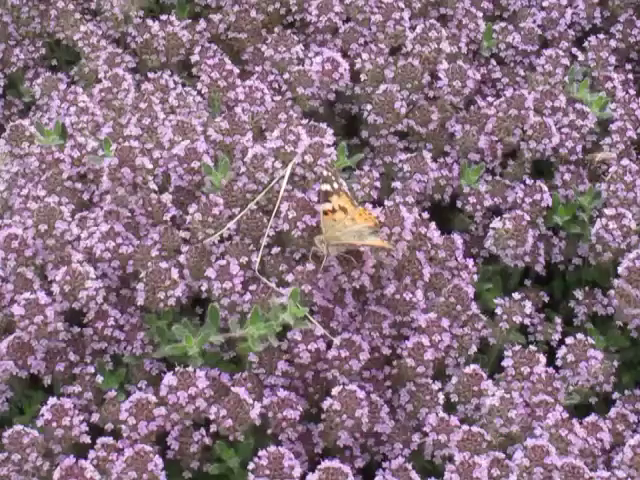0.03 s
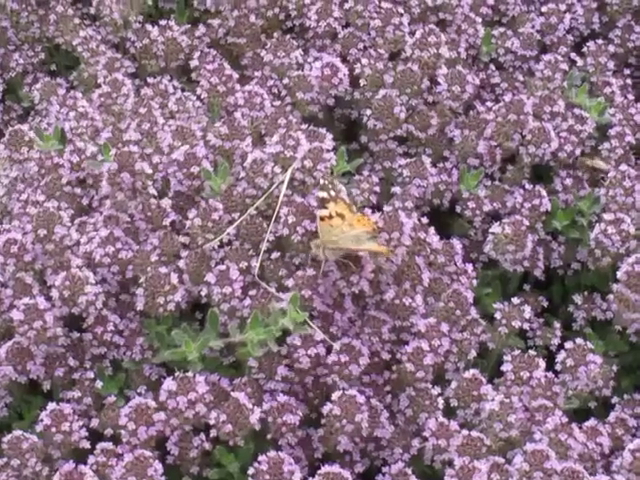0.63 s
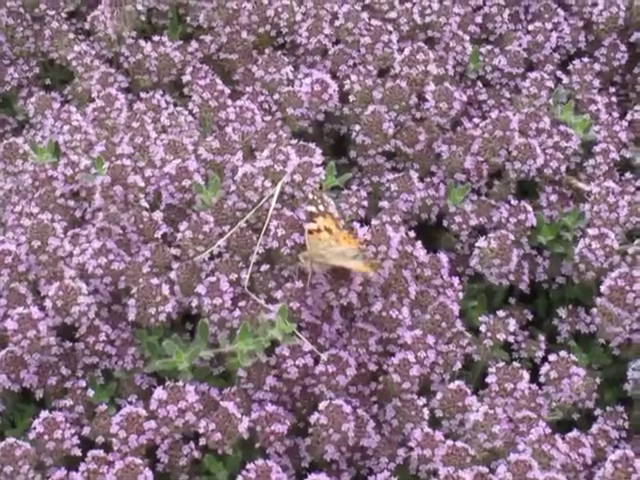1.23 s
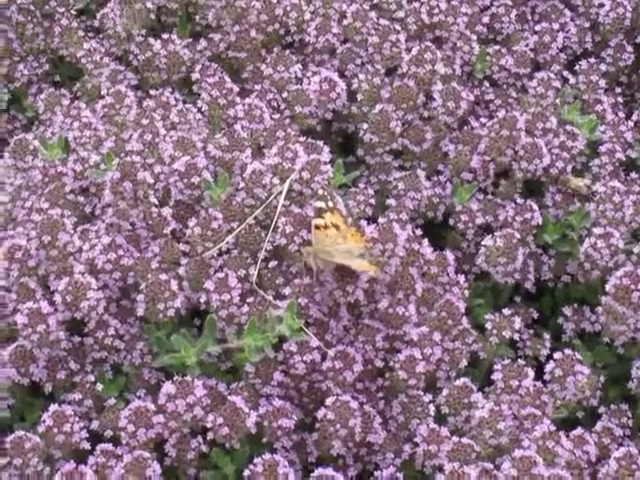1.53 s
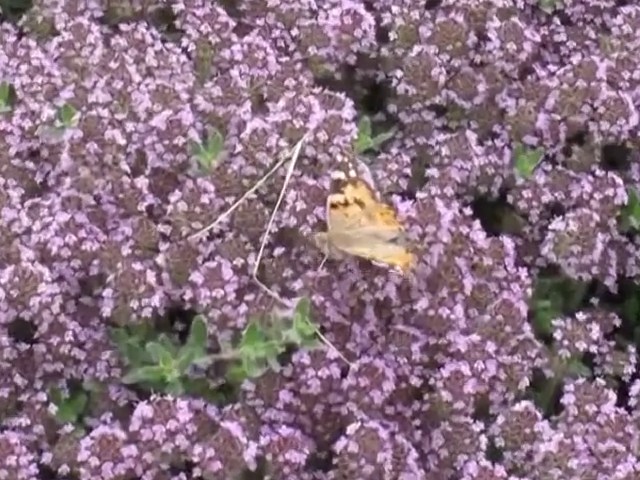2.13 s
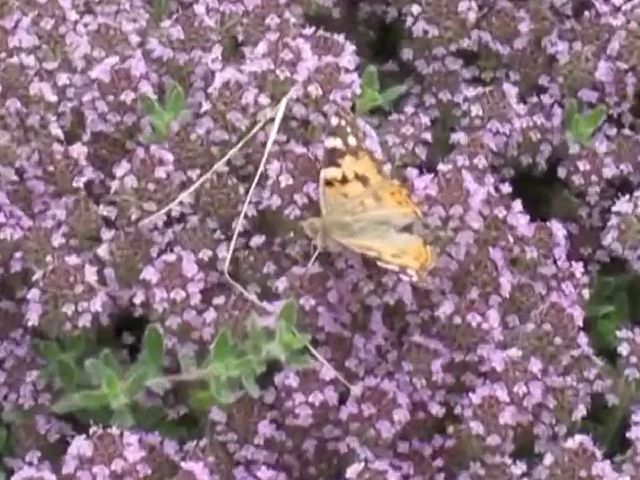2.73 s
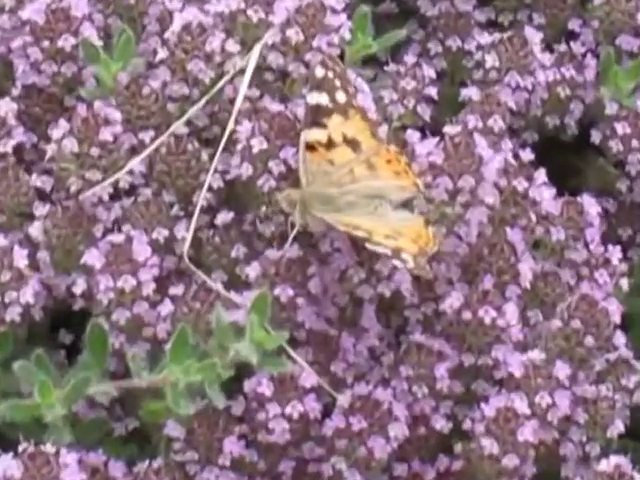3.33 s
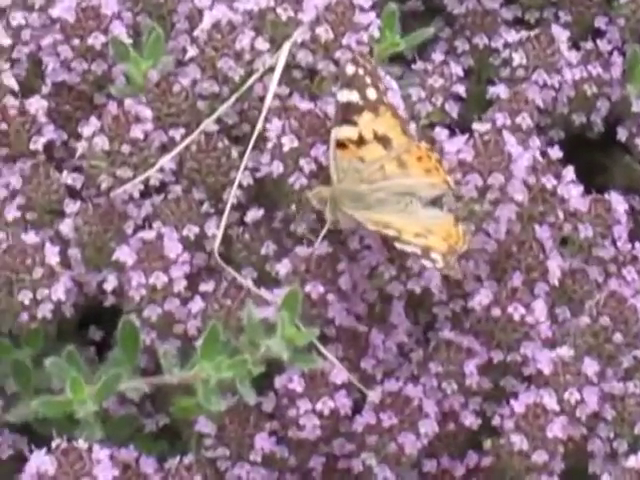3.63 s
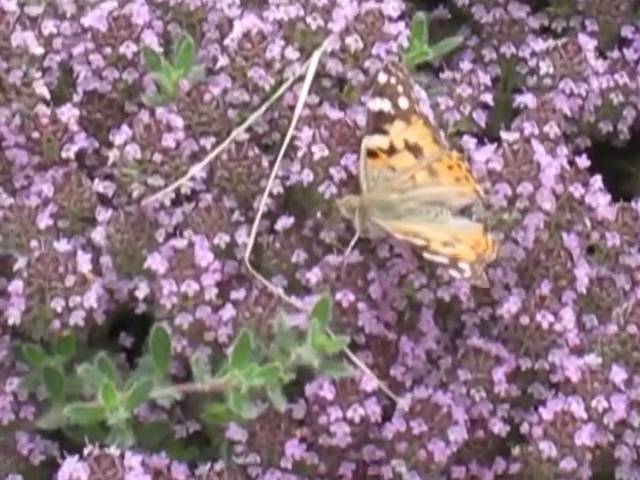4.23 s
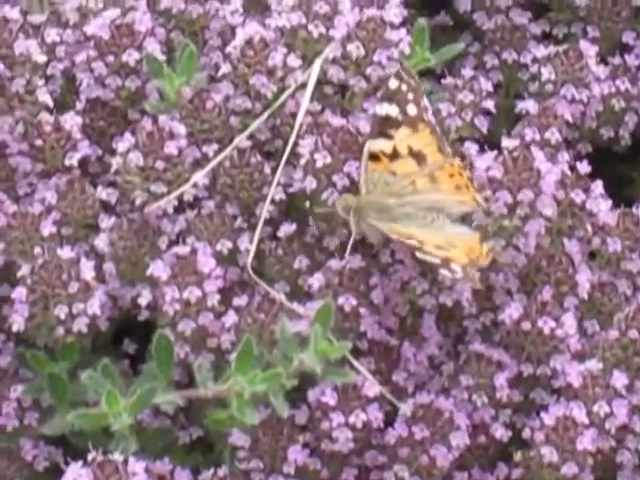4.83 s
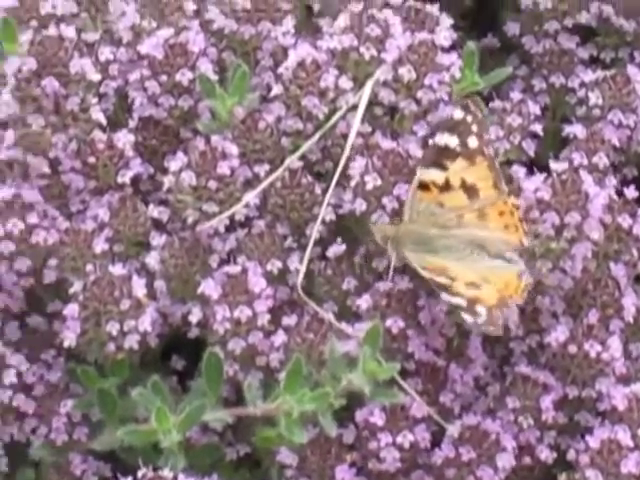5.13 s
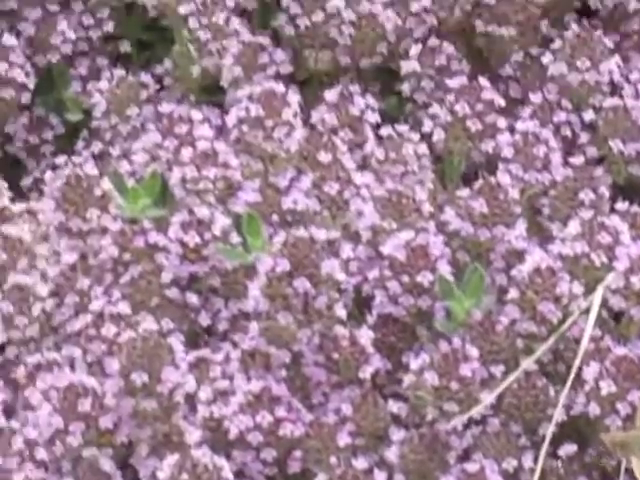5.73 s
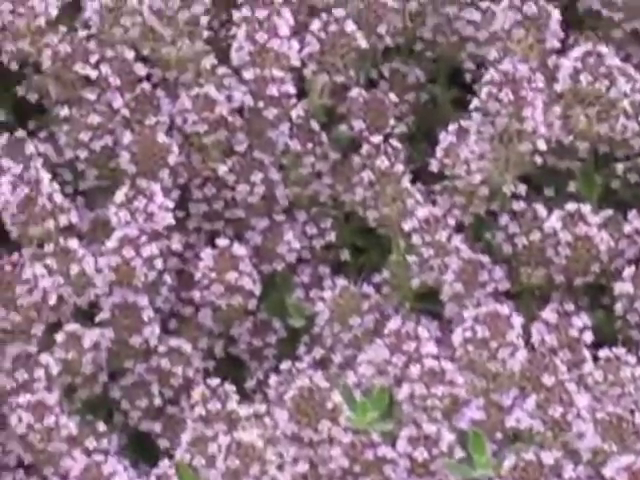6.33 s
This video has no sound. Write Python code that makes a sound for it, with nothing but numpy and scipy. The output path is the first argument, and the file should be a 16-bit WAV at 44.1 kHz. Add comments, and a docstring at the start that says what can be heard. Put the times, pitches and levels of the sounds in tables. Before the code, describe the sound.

A soft pop at about 0.1 seconds opens onto a quiet, even hush of outdoor air with a thin, high, steady camera whine. Bees hum faintly over flowers throughout, their overlapping buzzes swelling, fading and wavering in pitch. From about 1 to 1.6 seconds a finger rubs the plastic camera right at the microphone, with a few small zoom lever clicks, the clearest near 1.2 and 1.6 seconds. Around 2.7 seconds another rub and a tiny creak lead into one hard, sharp click with a dull bump, by far the loudest sound, briefly overloading the microphone. Then only the faint bees, air and whine remain, with barely audible soft rustles. From about 5.7 seconds a puff of wind buffets the microphone with a low rumble, peaking near 6.1 seconds and easing by 6.5.

```python
"""A soft pop as a hand-held camera switches on, then its thin whine over calm outdoor air.
Bees hum faintly over flowering thyme, each hum the harmonics of an unsteady wingbeat.
A finger rubs the camera and clicks its zoom lever, ringing the plastic case; the hardest
click overloads the recorder. Near the end a puff of wind buffets the microphone with a low rumble."""
import sys
import numpy as np
from scipy import signal
from scipy.fft import rfft, irfft, next_fast_len
from scipy.io import wavfile
from scipy.ndimage import map_coordinates

SR = 44100
rng = np.random.default_rng(int(sys.argv[2]) if len(sys.argv) > 2 else 0)


def inscribe(sig):
    """Save sig as 16-bit PCM at rate SR to the path in sys.argv[1].

    A 1-D sig is mono; a 2-D sig holds one channel per row.
    Samples are clipped to [-1, 1] before scaling.
    """
    pcm = np.round(np.clip(np.atleast_2d(sig).T, -1, 1) * 32767)
    wavfile.write(sys.argv[1], SR, pcm.astype(np.int16))


N = 289737
TIME = np.arange(N) / SR

# spectrum of air torn by wings: freq_hz, density_db
WING_RASP = [(780, -25), (950, 2.5), (2000, -2), (5000, -7.5), (10000, -29)]
# bright spectrum of the rustles and the lever's creak: freq_hz, density_db
BRIGHT_FRICTION = [(1500, -21), (4000, -7), (6500, -6), (9500, 8), (11000, -6), (12000, -14),
                   (15500, -10.5)]
BEE_ATTACK_S, BEE_RELEASE_S = .032, .06
WANDER_SHARE, WANDER_HZ = .012, 13  # slow unsteadiness of a wingbeat


def amp(db):
    """Decibels to gain."""
    return 10 ** (np.asarray(db) / 20)


def unit(x):
    """x at rms 1."""
    return x / np.sqrt(np.mean(x ** 2) + 1e-20)


def along(points, hz):
    """Read (freq_hz, value) points on a log frequency axis."""
    freqs, values = np.transpose(points)
    return np.interp(np.log(hz + 1), np.log(freqs + 1), values)


def wobble(rate_hz):
    """A smooth random curve with rate_hz knots a second."""
    coarse = TIME[::64]
    knots = rng.standard_normal(int(TIME[-1] * rate_hz) + 4)
    return np.interp(TIME, coarse, map_coordinates(knots, [coarse * rate_hz]))


def envelope(start_s, length_s, attack_s, release_s):
    """Rise, hold and die away."""
    t = TIME - start_s
    return np.clip(t / attack_s, 0, 1) * np.exp(-np.maximum(t - length_s, 0) / release_s)


def swell(peak_s, half_length_s):
    """A bell-shaped fade in and out."""
    return np.exp(-((TIME - peak_s) / half_length_s) ** 2)


def cut(x, edge_hz, kind, order):
    """Causal low- or high-pass."""
    return signal.sosfilt(signal.butter(order, edge_hz, kind, fs=SR, output="sos"), x)


def filtered(x, response):
    """Equalise x by a gain curve over frequency."""
    size = next_fast_len(N + SR // 2)
    return irfft(rfft(x, size) * response(np.fft.rfftfreq(size, 1 / SR)), size)[:N]


def coloured(x, spectrum):
    """x shaped by a spectrum, at rms 1."""
    return unit(filtered(x, lambda hz: amp(along(spectrum, hz))))


def noise_band(centre_hz, half_width_hz):
    """Noise in one resonance, at rms 1."""
    noise = rng.standard_normal(N)
    return unit(filtered(noise, lambda hz: np.exp(-((hz - centre_hz) / half_width_hz) ** 2)))


def ringing(t, hz, db, t60_s):
    """One dying mode."""
    return amp(db - 60 * t / t60_s) * np.sin(2 * np.pi * hz * t)


def air(level_db, drift_db):
    """An even bed of distant outdoor air and microphone hiss."""
    # spectrum of the hush: freq_hz, density_db
    hush = [(20, 2.5), (100, 1), (200, -1), (330, -3), (560, -4), (780, -13), (930, -4), (2000, -8),
            (4000, -9), (7000, -12.5), (9800, -10), (10800, -15.5), (11600, -40.5), (15500, -31.5)]
    level = amp(level_db + drift_db * wobble(2) + .3 * wobble(8))
    return level * coloured(rng.standard_normal(N), hush)


def narrow_swells():
    """Faint narrow swells in the buzz: a bee's high overtones and soft swishes."""
    # swells of narrow noise: peak_s, half_length_s, level_db, pitch_hz, half_width_hz
    bands = [(0.41, 0.042, -71, 2190, 70), (0.518, .03, -75, 2700, 110), (1.69, 0.093, -69, 1690, 230),
             (2.25, 0.11, -68, 1700, 170), (2.405, .04, -70.5, 3600, 130), (4.45, .11, -74.5, 4750, 230)]
    return sum(amp(db) * swell(peak_s, half_s) * noise_band(hz, half_width_hz)
               for peak_s, half_s, db, hz, half_width_hz in bands)


def rustles(grain_db):
    """Faint grainy swells in the treble."""
    # soft rustles: peak_s, level_db
    stirs = [(2.33, -72), (3.52, -72), (4.13, -70), (4.7, -70), (6.28, -75)]
    level = sum(amp(db) * swell(peak_s, half_length_s=.12) for peak_s, db in stirs)
    grains = amp(grain_db * wobble(300)) * rng.standard_normal(N)
    return level * coloured(grains, BRIGHT_FRICTION)


def wind(gust_s, gust_db, lumps_db, lump_hz, eddy_gain_db):
    """A gust and its buffets rumble low; a few eddies each push and pull the membrane once."""
    # spectrum of wind on the microphone: freq_hz, density_db
    rumble = [(12, -9), (32, 5.5), (80, 4.5), (150, -4.5), (220, -20.5), (400, -28), (900, -75)]
    # buffets: peak_s, relative_db
    buffets = [(5.015, -62), (5.49, -66.5), (5.75, -61), (5.875, -51), (5.985, -51.5), (6.11, -46),
               (6.23, -55.5), (6.355, -55), (6.43, -62), (6.52, -62)]
    # single hard eddies: centre_s, relative_db, pitch_hz
    eddies = [(5.882, -47, 120), (6.117, -36.5, 108.1), (6.158, -48, 140), (6.222, -50, 150),
              (6.288, -43, 65)]
    rise_db_per_s, fall_db_per_s = 26, 21.5
    gust = amp(gust_db - np.maximum(rise_db_per_s * (gust_s - TIME), fall_db_per_s * (TIME - gust_s)))
    puffs = sum(amp(db) * swell(peak_s, half_length_s=.032) for peak_s, db in buffets)
    lumps = amp(lumps_db * (wobble(lump_hz) - 1.5))
    out = (gust + puffs) * lumps * coloured(rng.standard_normal(N), rumble)
    for centre_s, db, hz in eddies:
        phase = 2 * np.pi * hz * (TIME - centre_s)
        out -= amp(db + eddy_gain_db) * phase * np.exp(-phase ** 2 / 2)
    return out


def wings(beat_hz, usual_hz, harmonics):
    """Harmonics of an unsteady wingbeat; each swells and fades as the bee turns."""
    # overtone balance of a beating wing: freq_hz, level_db
    timbre = [(210, -12.5), (400, 1), (490, 1), (620, -9.5), (720, -12), (800, -18.5), (920, -11),
              (1400, -9), (2200, -17.5), (3500, -19), (6000, -28)]
    jitter = 1 + .012 * wobble(40)
    phase = 2 * np.pi * np.cumsum(beat_hz * jitter) / SR
    buzz = np.zeros(N)
    for k in range(1, harmonics + 1):
        gain = amp(along(timbre, k * usual_hz)) * (1 + .3 * wobble(7))
        buzz += gain * np.sin((k * phase + rng.uniform(0, 2 * np.pi)).astype(np.float32))
    return buzz


def far_bees(level_db, drift_share, count=6):
    """A bed of bees further off, each drifting in pitch and distance."""
    swarm = np.zeros(N)
    for hz in np.linspace(200, 240, count):
        nearness = amp(2 * np.tanh(wobble(3.8)))
        beat_hz = hz * (1 + drift_share * wobble(3.6))
        swarm += nearness * wings(beat_hz, hz, harmonics=14)
    return amp(level_db) * unit(swarm)


def foragers(gain_db, wingbeat_hz, drift_share, count=2):
    """Bees in the blossoms buzz thinly: only the upper overtones of their sharp wing pulses carry."""
    # spells of work in a blossom: start_s, length_s, relative_db
    visits = [(0.353, 0.29, -70), (3.12, 0.78, -73.5), (4.5, .25, -73), (4.85, 0.27, -72.5),
              (5.353, 0.34, -72.5), (6.098, 0.41, -70.5)]
    pulses = np.zeros(N)
    for _ in range(count):
        beat_hz = wingbeat_hz * (1 + drift_share * wobble(4) + WANDER_SHARE * wobble(WANDER_HZ))
        beats = np.floor(np.cumsum(beat_hz) / SR)
        pulses += amp(3 * np.tanh(wobble(9))) * np.diff(beats, prepend=0)
    level = sum(amp(db + gain_db) * envelope(start_s, length_s, BEE_ATTACK_S, BEE_RELEASE_S)
                for start_s, length_s, db in visits)
    return level * coloured(pulses, WING_RASP)


def near_bees(gain_db, flutter_db, spin_up_hz, spin_up_s):
    """A bee spins up at take-off and glides in pitch as it climbs or settles; darting wavers the hum."""
    # hops from flower to flower: start_s, length_s, wingbeat_hz, glide_hz_per_s, relative_db
    flights = [(.1, 0.44, 207.7, 14, -76.5), (.62, 0.35, 215.6, 0, -71), (1.03, 0.28, 213.7, -2, -67.5),
               (1.301, .38, 211, -35, -70), (1.33, 0.21, 222.4, -9, -76), (1.849, 0.15, 232.2, 18.5, -71.5),
               (2.098, 0.19, 217.5, -78.5, -73.5), (2.138, .25, 239.8, -28, -71),
               (2.3, .42, 205.2, 13.5, -72), (2.418, 0.33, 240, -55, -73.5),
               (2.782, 0.2, 201.2, -105, -71.5), (2.849, .2, 231.7, 0, -76), (3.078, .2, 191, -55, -76.5),
               (3.109, .45, 242.2, -30, -68), (3.531, 0.541, 221.2, -56, -73),
               (3.619, .38, 237.5, -0.5, -71), (4.452, 0.19, 240.2, -24.5, -69.5),
               (4.831, 0.32, 240.2, -30, -75), (4.92, .36, 219.8, -31.5, -75.5),
               (5.38, 0.51, 198, 32, -73.5), (5.4, .42, 233, 0, -76.5), (6.13, 0.34, 240.3, -18.5, -72)]
    out = np.zeros(N)
    for start_s, length_s, hz, glide, db in flights:
        t = np.clip(TIME - start_s, 0, length_s + BEE_RELEASE_S)
        beat_hz = hz - spin_up_hz * np.exp(-t / spin_up_s) + glide * t
        beat_hz *= 1 + WANDER_SHARE * wobble(WANDER_HZ)
        level = amp(db + gain_db + flutter_db * np.tanh(wobble(18)))
        level *= envelope(start_s, length_s, BEE_ATTACK_S, BEE_RELEASE_S)
        out += level * wings(beat_hz, hz, harmonics=11)
    return out


def roughened(hum, tremble_share, rasp_db):
    """The hum trembles, and every wingbeat pushes out a little rasp of air."""
    rasp = np.abs(hum) * coloured(rng.standard_normal(N), WING_RASP)
    return hum * (1 + tremble_share * wobble(70)) + amp(rasp_db) * rasp


def whine(level_db, pitch_hz):
    """The thin steady tone of the camera's electronics."""
    return amp(level_db + .3 * wobble(6)) * unit(np.sin(2 * np.pi * pitch_hz * TIME))


def finger(gain_db, grain_db):
    """Skin sticks and slips in tiny grains; each stroke stirs the case and its own scrape resonance."""
    # spectrum of skin sliding on plastic: freq_hz, density_db
    skin_colour = [(300, -30.5), (700, -12), (1300, -9.5), (2200, -10), (3300, 1), (4200, 1), (4800, -8.5),
                   (5450, -3.5), (6400, -8.5), (8400, -.5), (9600, 0.5), (10400, -3.5), (11600, -23.5),
                   (15000, -28)]
    # dull spectrum of the case under the finger: freq_hz, density_db
    body_colour = [(300, -30), (650, 0.5), (1100, 0), (2000, -14), (5000, -40)]
    # finger strokes: start_s, length_s, relative_db, body_db, scrape_hz, scrape_db
    strokes = [(.37, 0.22, -69.5, -13, 4600, -5.5), (0.992, 0.088, -61.5, -16, 3900, -3.5),
               (1.137, .049, -66, -11, 3900, -6), (1.226, 0.0098, -49, -9, 4000, -6),
               (1.385, 0.025, -62, -8, 4000, -5), (1.416, 0.045, -57.5, -12, 3400, -5),
               (1.464, 0.054, -53.5, -11.5, 5400, -9), (1.512, 0.084, -57, -8, 5450, -9),
               (2.651, 0.033, -60, -4, 3700, -9), (2.683, 0.096, -58.5, -5.5, 3800, -12),
               (2.7488, 0.00502, -44, -11, 9500, -4), (2.753, 0.0031, -34, -6.5, 6500, -1.5),
               (5.354, 0.086, -68.5, -8, 4500, -5.5)]
    slips = amp(grain_db * wobble(700)) * rng.standard_normal(N)
    skin, body = coloured(slips, skin_colour), coloured(slips, body_colour)
    out = np.zeros(N)
    for start_s, length_s, db, body_db, scrape_hz, scrape_db in strokes:
        pressure = envelope(start_s, length_s, attack_s=.45 * length_s, release_s=.13 * length_s)
        scrape = noise_band(scrape_hz, half_width_hz=420)
        out += amp(db + gain_db) * pressure * (skin + amp(body_db) * body + amp(scrape_db) * scrape)
    return out


def creak(start_s, length_s, gain_db, slip_hz, slip_decay_s):
    """A quick run of tiny bright slips as the lever is forced toward its catch."""
    started = TIME > start_s
    cycles = np.cumsum(slip_hz * (1 + .15 * wobble(120)) * started) / SR
    since_slip = (cycles % 1) / slip_hz
    slips = started * np.exp(-since_slip / slip_decay_s) * rng.standard_normal(N)
    level = amp(gain_db) * envelope(start_s, length_s, attack_s=.001, release_s=.002)
    return level * coloured(slips, BRIGHT_FRICTION)


def lever(crack_db, crack_t60_s):
    """Each contact rings the case: soft ones knock, hard ones also ring the lever and snap its catch."""
    # zoom lever contacts: start_s, knock_db, ring_db, snap_db
    clicks = [(1.23471, -29, -44, -53), (1.23947, -22, -41, -67), (1.3675, -40, -54, -58),
              (1.462, -35.5, -49, -62), (1.59498, -18, -15, -46), (2.6588, -45, -47.5, -68),
              (2.75631, -1.7, -6, -16), (2.75681, 1.6, 3, -7.5), (2.75937, -9.5, -18, -19)]
    # modes of the plastic case and lever: pitch_hz, level_db, t60_s
    case_modes = [(640, -13, 0.014), (837, -3, 0.004376), (1520, -27, 0.014), (2480, -27, 0.022),
                  (3020, -2.5, 0.01), (3336, -12, 0.024), (3620, -7.5, .0097), (4080, -10, 0.012)]
    # modes of the small catch: pitch_hz, level_db, t60_s
    catch_modes = [(5320, -4, 0.0061), (5760, -5.5, .0076), (6850, -2, 0.0067), (7890, -10, .007),
                   (9020, -3.5, 0.0088), (9497, -2, .007), (10250, -8.5, .006), (12550, -12, 0.0035),
                   (14600, -14.5, .005)]
    out, t = np.zeros(N), np.arange(SR // 10) / SR
    catch = sum(ringing(t, *mode) for mode in catch_modes)
    for start_s, knock_db, ring_db, snap_db in clicks:
        blow = [(1200, knock_db), (2900, ring_db)]  # freq_hz, level_db
        # neighbouring modes start in opposite directions
        body = sum((-1) ** k * ringing(t, hz, db + along(blow, hz), t60_s)
                   for k, (hz, db, t60_s) in enumerate(case_modes))
        body = cut(body, edge_hz=4250, kind="low", order=8)
        crack = amp(crack_db - 60 * t / crack_t60_s) * rng.standard_normal(len(t))
        snap = cut(crack, edge_hz=10500, kind="low", order=6) + catch
        out[round(start_s * SR):][:len(t)] += body + amp(snap_db) * snap
    # the small stiff case gives off no bass
    return cut(out, edge_hz=512, kind="high", order=5)


def jolt(start_s, push_db, shudder_db, t60_s):
    """The hardest click sends a dull push and a short shudder through the camera to its microphone."""
    t = np.maximum(TIME - start_s, 0)
    push = amp(push_db) * np.exp(-t / .00098)
    low_noise = unit(cut(rng.standard_normal(N), edge_hz=250, kind="low", order=2))
    shudder = amp(shudder_db - 60 * t / t60_s) * low_noise
    return cut((t > 0) * (push + shudder), edge_hz=420, kind="low", order=4)


def overload(x, ceiling, duck_db, recovery_s):
    """Peaks flatten; each overload turns the gain down for a moment."""
    last_over = np.maximum.accumulate(np.where(np.abs(x) > ceiling, TIME, -10))
    since = TIME - last_over
    duck = (1.5 - np.exp(-since / .004)) * np.exp(-(since / recovery_s) ** 2)
    return np.clip(x * amp(duck_db * duck), -ceiling, ceiling)


def scene():
    """Faint bees and outdoor air behind the camera's own close noises, in mono."""
    hum = near_bees(gain_db=.94, flutter_db=3, spin_up_hz=8, spin_up_s=.04)
    bees = roughened(hum, tremble_share=.27, rasp_db=-7)
    bees += far_bees(level_db=-74, drift_share=.04)
    bees += foragers(gain_db=1, wingbeat_hz=235, drift_share=.025)
    outdoors = air(level_db=-64, drift_db=-.28) + narrow_swells() + rustles(grain_db=6)
    outdoors += wind(gust_s=6.15, gust_db=-54.5, lumps_db=1, lump_hz=29, eddy_gain_db=2.5)
    handling = finger(gain_db=-1, grain_db=3.5)
    handling += creak(start_s=2.703, length_s=.05, gain_db=-60, slip_hz=220, slip_decay_s=.0007)
    handling += lever(crack_db=-8, crack_t60_s=.009)
    handling += jolt(start_s=2.757, push_db=-20.5, shudder_db=-44, t60_s=.15)
    return (bees + outdoors + handling + whine(level_db=-70, pitch_hz=5880))[None]


def record(dry):
    """The input pops on with a small settling step, overloads on peaks and loses its top treble."""
    switch_on_s, rise_s, settle_s = .095, .0001, .044
    since_on = np.maximum(TIME - switch_on_s, 0)
    pop = amp(-39.5) * (1 - np.exp(-since_on / rise_s)) * np.exp(-since_on / settle_s)
    live = (TIME > switch_on_s) * (dry[0] - pop)
    limited = overload(live, ceiling=.74, duck_db=-2.5, recovery_s=.0604)
    softened = cut(limited, edge_hz=13500, kind="low", order=2)
    return cut(softened, edge_hz=15900, kind="low", order=14)[None]


dry = scene()
out = record(dry)
inscribe(out)
```